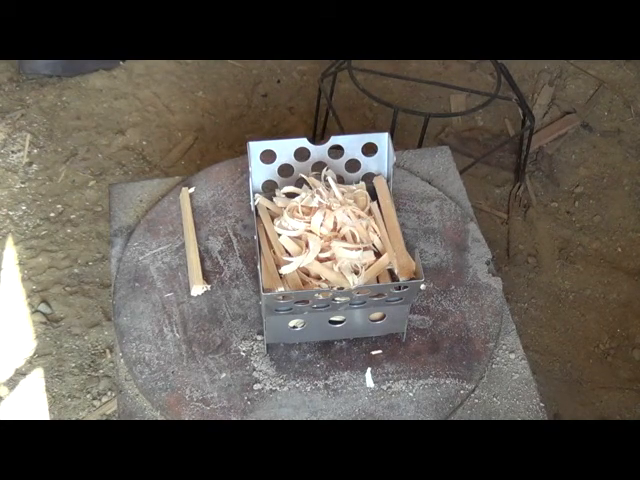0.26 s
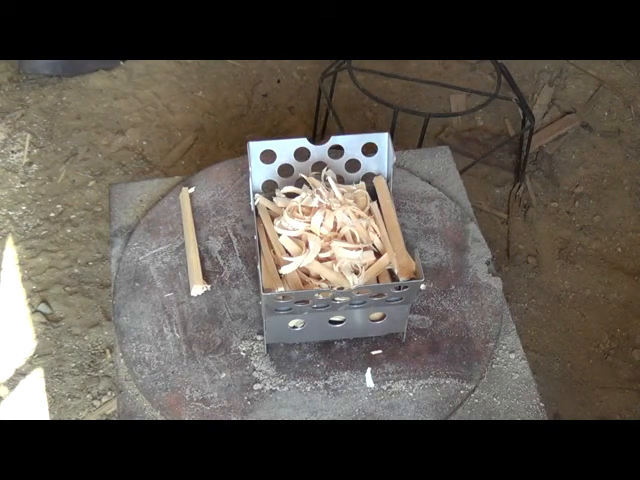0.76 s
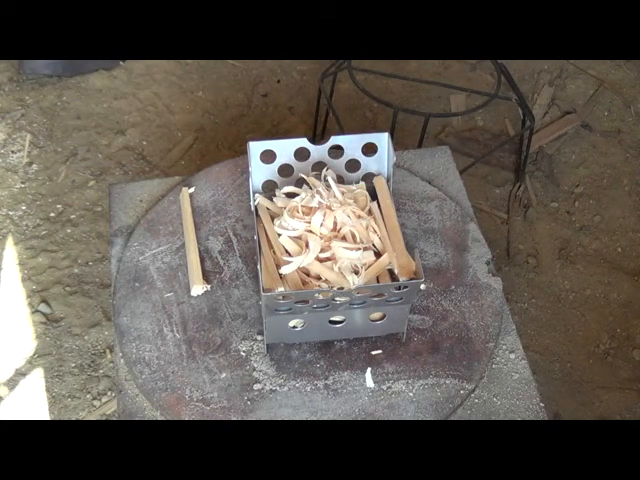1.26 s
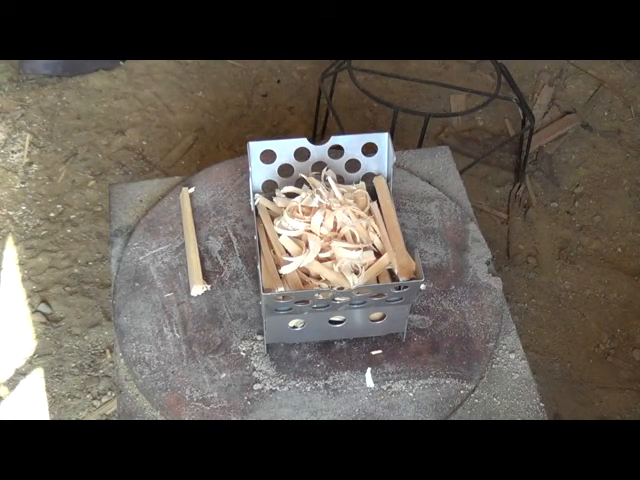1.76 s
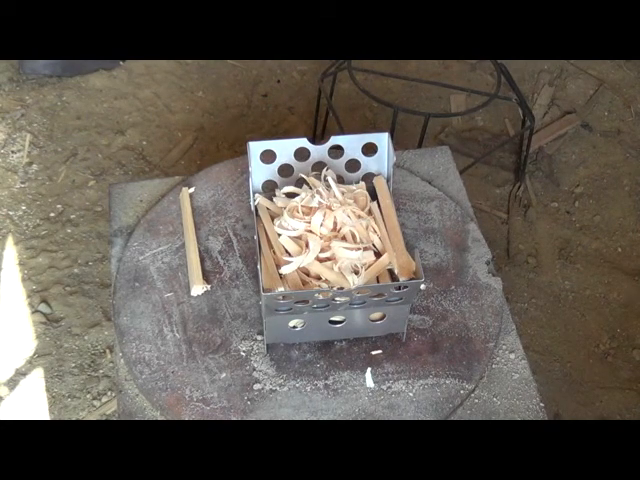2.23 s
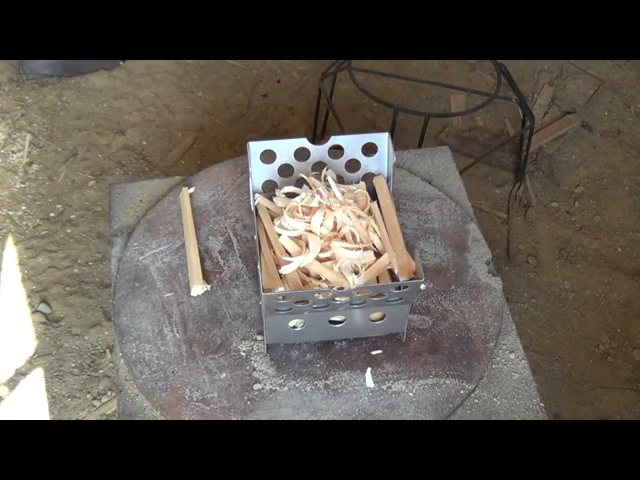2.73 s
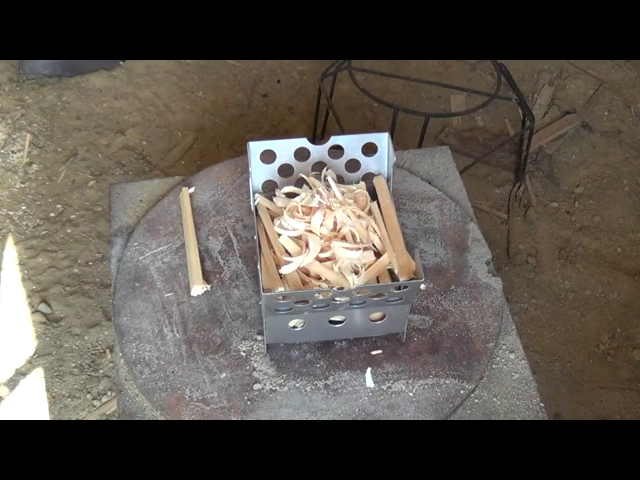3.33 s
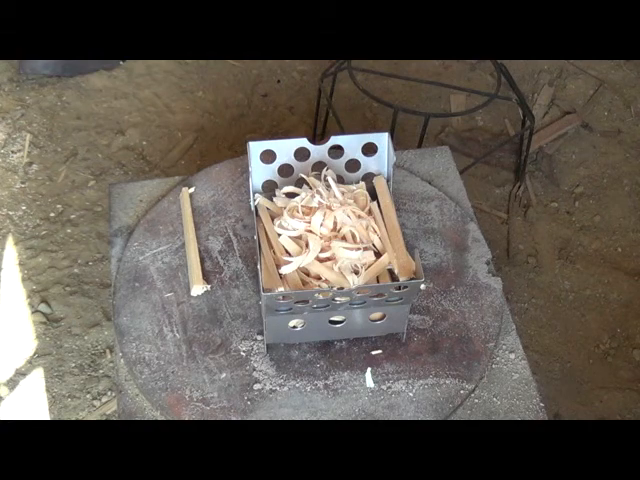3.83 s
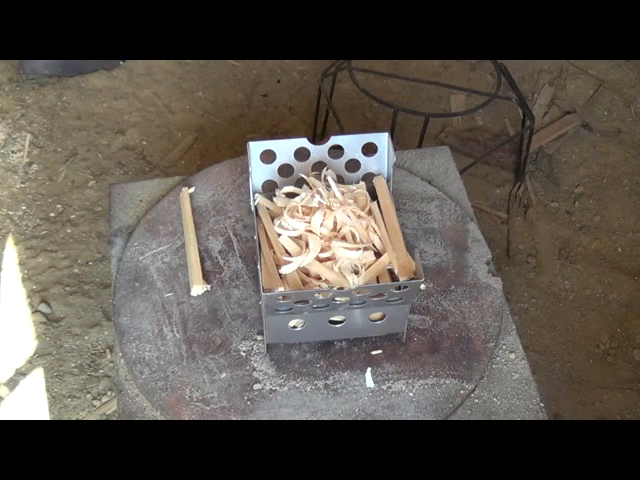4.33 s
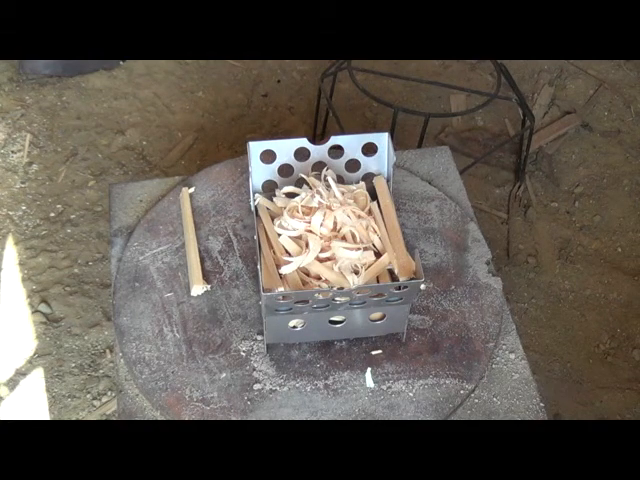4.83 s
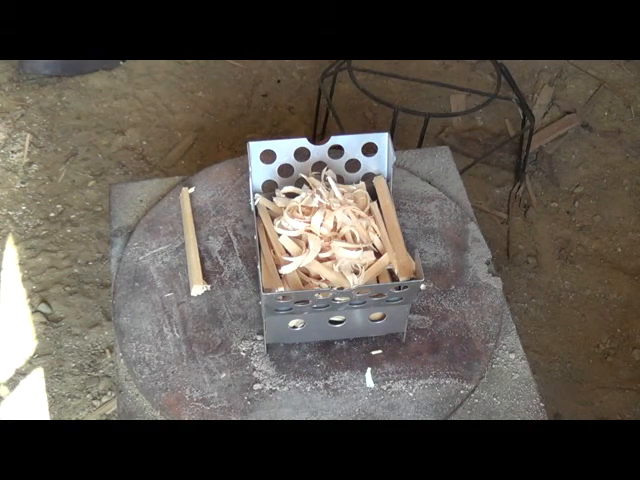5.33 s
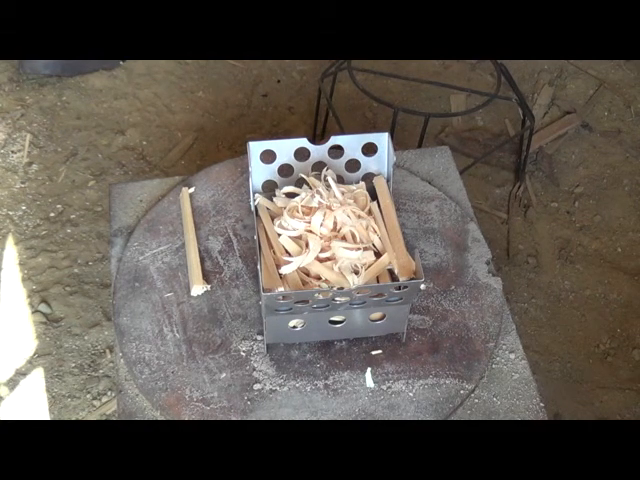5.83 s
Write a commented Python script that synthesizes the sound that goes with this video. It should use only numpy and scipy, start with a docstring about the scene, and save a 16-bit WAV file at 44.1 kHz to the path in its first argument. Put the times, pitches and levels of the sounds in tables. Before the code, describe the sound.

Card rustles and snaps close by, a cluster of wooden knocks and loud clicks lands around 1.5 seconds, then lighter, sparser flicks over soft hiss.

```python
"""Hands work a paper matchbook just left of a camera's microphones in a covered yard: card rubs and snaps,
and a match head scuffs the strip, all made of grainy noise ringing in card resonances.
Dull knocks drive the modes of a wooden thing near the middle, with short low hums as it rocks to rest.
Close roof, posts and table return a short dull tail to the touches and knocks; behind them the camera's
works tick faintly as filtered impulses, over air and microphone hiss made of noise bands."""
import sys
import numpy as np
from scipy import signal
from scipy.io import wavfile
from scipy.ndimage import uniform_filter1d

SR = 44100
rng = np.random.default_rng(int(sys.argv[2]) if len(sys.argv) > 2 else 0)


def generate_wav(sig):
    """Save sig (samples, or channels by samples) to the path in sys.argv[1] as 16-bit PCM at SR."""
    pcm = np.round(np.clip(np.atleast_2d(sig).T, -1, 1) * 32767).astype(np.int16)
    wavfile.write(sys.argv[1], SR, pcm)


N = 268128  # length in samples
OPPOSITE = np.array([[1], [-1]])  # signs of a side signal at the left and right microphone


def undb(db):
    """Amplitude factor of a level in dB."""
    return 10 ** (np.asarray(db) / 20)


def level(x, db):
    """Scales a sound to an RMS level in dB."""
    return x * undb(db) / np.sqrt(np.mean(x ** 2))


def sides(pan_db):
    """Left and right gains in dB for a difference of left minus right."""
    return OPPOSITE * pan_db / 2


def band(x, hz, width):
    """Two-pole resonance, gain 1 at the centre."""
    b, a = signal.iirpeak(min(hz, .45 * SR), hz / width, fs=SR)
    return signal.lfilter(b, a, x)


def ring_width(t60):
    """Width in Hz of a resonance that falls by 60 dB in t60 seconds."""
    return np.log(1000) / np.pi / t60


def resonate(x, peaks):
    """Steep resonances side by side, neighbours in opposite phase; scaled to about keep white noise's level."""
    out, power = 0, 0
    for k, (hz, width, db) in enumerate(peaks):
        out = out + (-1) ** k * undb(db) * band(band(x, hz, width), hz, width)
        power += undb(db) ** 2 * width * np.pi / 2 / SR
    return out / np.sqrt(power)


def fade(t60):
    """Exponential decay down to -60 dB, lasting at least 2 ms."""
    length = max(t60, .002) * SR
    return 10 ** (-3 * np.arange(int(length)) / length)


def swell(rise, t60, hold):
    """Linear rise of at least 0.5 ms, hold, exponential fall."""
    up = np.linspace(0, 1, int(max(rise, .0005) * SR))
    return np.concatenate([up, np.ones(int(hold * SR)), fade(t60)])


def add(out, s, x, pan_db):
    """Mixes a sound in at a time and a side."""
    i = int(s * SR)
    x = x[:N - i]
    out[:, i:i + len(x)] += x * undb(sides(pan_db))


def walk(rate):
    """Random levels held 1 / rate s and slewed twice; spread near 1."""
    k = int(SR / rate)
    steps = np.repeat(rng.standard_normal(N // k + 1), k)
    return 0.53 * uniform_filter1d(uniform_filter1d(steps, k), k)[:N]


def slips(size, grain_db, count=30):
    """Paper fibres letting go: noise in grains of under a millisecond, many small and a few large."""
    grains = np.repeat(rng.exponential(size=size // count + 1), count)[:size]
    return level(rng.standard_normal(size) * undb(grain_db * grains), 0)


def shaken(grit, s, rise, t60, hold=0):
    """The slips that fall under one swelling and dying contact, with room for the ring after it."""
    start = int(s * SR)
    shape = np.pad(swell(rise, t60, hold), (0, 3000))[:N - start]
    return shape * grit[start:][:len(shape)]


# Air and hiss by band, before the overall level is set: f/Hz, density level/dB (per Hz)
AIR_SPECTRUM = [(45, 1), (100, -5.5), (200, -3.5), (400, -0.5), (900, -4), (1800, -1.5), (3000, -10.5),
                (5000, -7), (7500, -11.5), (11000, -11.5)]
# How alike the air is at the two microphones: f/Hz, left-right correlation (0 to 1)
AIR_CORRELATION = [(60, 1), (300, 0.78), (1200, 0.023), (5000, 0.19), (11000, 1)]
AIR_DB = -64.5  # RMS over both microphones


def air():
    """Third-octave bands of outdoor air and microphone hiss that swell and flicker."""
    air_hz, air_db = np.transpose(AIR_SPECTRUM)
    like_hz, likeness = np.transpose(AIR_CORRELATION)
    out, slow = 0, walk(.7)  # all bands share the slow swell
    for hz in 45 * 2 ** (np.arange(25) / 3):
        mid, side = (resonate(rng.standard_normal(N), [(hz, hz / 3, 0)]) for _ in range(2))
        # wider bands hold more of the density per Hz
        db = np.interp(np.log(hz), np.log(air_hz), air_db) + 10 * np.log10(hz)
        like = np.interp(np.log(hz), np.log(like_hz), likeness)
        pair = np.sqrt(1 + like) * mid + np.sqrt(1 - like) * side * OPPOSITE
        flicker_db = 0.63 * slow + 1.1 * walk(8)
        out = out + undb(db + flicker_db) * pair
    return level(out, AIR_DB)


TICK_RATE, TICK_START_S = 30000 / 1001, .006  # ticks per second; first tick
TICK_HZ, TICK_T60_S, TICK_DB = 2727, .03, -75  # pitch; ring time; RMS midway between the microphones


def camera():
    """Once a frame the camera's works tick, to and fro by turns, nearer the right microphone."""
    ticks = np.arange(int(N / SR * TICK_RATE))
    at = ((TICK_START_S + ticks / TICK_RATE) * SR).astype(int)
    push = np.zeros(N)
    push[at] = (-1.) ** ticks * undb(1.6 * rng.standard_normal(len(at)))
    width = ring_width(TICK_T60_S)
    tick = band(band(push, TICK_HZ, width), TICK_HZ, 3 * width)
    return level(tick, TICK_DB) * undb(sides(-3))


YARD_T60_S, YARD_DB = .075, -6.5  # fall time; tail energy against the direct sound, for white noise
YARD_HZ, YARD_WIDTH_HZ = 2540, 5000  # centre and width of the tail's band


def yard(direct):
    """Nearby roof, posts and table send back a short duller tail, different at each side."""
    shape = np.pad(fade(YARD_T60_S), (60, 0))  # the tail sets in 60 samples late
    middle, out = direct.mean(0), []
    for _ in range(2):
        noise = shape * rng.standard_normal(len(shape))
        tail = level(band(noise, YARD_HZ, YARD_WIDTH_HZ), YARD_DB) / np.sqrt(len(shape))
        out.append(signal.fftconvolve(middle, tail)[:N])
    return np.array(out)


# The wood rocks to rest and hums, near the middle: t/s, length/s, f/Hz, peak level/dB
ROCKING_HUMS = [(1.437, .025, 84.5, -38), (1.442, 0.045, 131, -28.5), (1.53, 0.022, 218, -29),
                (1.592, 0.083, 153, -35), (1.69, 0.063, 165.4, -42.5), (1.707, 0.031, 374, -41),
                (1.74, 0.037, 365, -43)]


def rocking():
    """Short low hums of the wood that swell and fade, as sines under a raised-cosine swell."""
    out = np.zeros((2, N))
    for s, length, hz, db in ROCKING_HUMS:
        t = np.arange(int(length * SR)) / SR
        shape = np.sin(np.pi * t / length) ** 2
        add(out, s, undb(db) * shape * np.sin(2 * np.pi * hz * t), .4)
    return out


# Dull blows on the wooden thing: t/s, level/dB (RMS of the early part), rise/s, rattle t60/s, contact f/Hz
BLOWS = [(1.448, -26.5, 0.0021, 0.1, 1060), (1.469, -36, .002, 0.11, 554), (1.537, -31, 0.001, .12, 1240),
         (1.546, -26, 0.0015, 0.085, 534), (1.575, -38.5, 0.0033, 0.18, 930), (1.669, -46, .004, 0.1, 664),
         (1.7, -48, 0.035, 0.14, 400), (1.855, -44.5, .005, 0.057, 970), (3.031, -57.5, 0.0032, 0.046, 510),
         (5.25, -80, .001, .01, 1290), (5.466, -56, 0.0013, 0.05, 780), (5.794, -54, 0.0008, 0.041, 2080)]
# Modes of the wooden thing: f/Hz, relative level/dB, t60/s
WOOD_MODES = [(149, 3.5, 0.085), (294, -8, 0.026), (523, -7, 0.18), (780, -13.5, 0.066), (1100, -37, 0.163),
              (1211, -7.5, 0.064), (1460, -36, 0.068), (1650, -15, 0.038), (2160, -12, 0.032)]


def knocks():
    """A rattling contact drives the wood's modes, most strongly those near the contact's own pitch."""
    out, grit = np.zeros((2, N)), slips(N, grain_db=2.5)
    for s, db, rise, t60, contact_hz in BLOWS:
        push = resonate(shaken(grit, s, rise, t60), [(contact_hz, 1.3 * contact_hz, 0)])
        ring = 0.17 * push  # the bare contact heard beside the modes
        for hz, mode_db, mode_t60 in WOOD_MODES:
            ring = ring + undb(mode_db) * band(push, hz, ring_width(mode_t60))
        early = ring[:int((rise + t60 / 4) * SR)]
        add(out, s, ring * undb(db) / np.sqrt(np.mean(early ** 2)), .6)
    return out


# Hiss of the card's edge: f/Hz, width/Hz, relative level/dB
EDGE_HISS = [(8900, 5000, 7.5), (10396, 4140, 7)]
# Thud of the booklet: f/Hz, width/Hz, relative level/dB
BOOKLET = [(553, 1210, 2.5), (1460, 3300, -1)]


def card(push, ring, body_db, edge_db):
    """The card rings in the middle, its edge hisses on top, the booklet thuds below."""
    body = undb(body_db) * resonate(push, BOOKLET)
    edge = (-1) ** len(ring) * undb(edge_db) * resonate(push, EDGE_HISS)  # phases go on alternating
    return resonate(push, ring) + body + edge


# Fingers sliding on card, levels gliding between rows: t/s, ring level/dB, body over ring level/dB
SLIDES = [(0.0, -58.5, -2), (0.299, -59.5, -1), (0.6, -52.5, -3.5), (0.75, -54.5, -2), (1.12, -57, 1.5),
          (1.4, -54, -1), (1.52, -40.5, 3.5), (1.66, -53, 4), (1.8, -55, 4), (1.94, -42, -8.5),
          (2.06, -52.5, -1.5), (2.2, -48.5, -2.5), (2.69, -55.5, 0), (2.81, -62.5, -1.5),
          (3.37, -61.5, -0.5), (3.54, -63.5, 0), (3.86, -57, -6.5), (4.03, -64, -2), (4.21, -64, 2.5),
          (4.59, -66.5, -1), (4.99, -61.5, -6), (5.32, -67, -4), (5.5, -62.5, -3), (5.74, -64, -3.5),
          (6.08, -64.5, -1)]
# Resonances of the rubbed card: f/Hz, width/Hz, relative level/dB
CARD_RING = [(2980, 1480, 1), (3550, 1570, -2.5), (5620, 2200, -7)]
RUB_EDGE_DB, RUB_SIDE_DB, RUB_PAN_DB = -1.5, -7, 2  # mean treble over ring; side under mid; left minus right


def rubbing():
    """Sliding fingers and sleeves as grainy noise through the card, spread wide; the grip flutters."""
    s, ring_db, body_db = np.transpose(SLIDES)
    t = np.arange(N) / SR
    db = np.interp(t, s, ring_db)
    body_db = np.interp(t, s, body_db) + 0.5 * walk(24)
    edge_db = RUB_EDGE_DB + 2.9 * walk(19)
    grip = undb(2.0 * walk(40))
    mid, side = (card(grip * slips(N, grain_db=1.09), CARD_RING, body_db, edge_db) for _ in range(2))
    sound = mid + undb(RUB_SIDE_DB) * side * OPPOSITE
    return sound * undb(db + sides(RUB_PAN_DB))


HANDS_PAN_DB, HANDS_SWAY_DB = 4.5, 2  # mean left minus right; scatter from touch to touch


def touch(out, s, push, hz, width, upper_db, body_db, edge_db, db):
    """One contact rings the card at its own pitch and an overtone, left of the microphones."""
    ring = [(hz, width * hz, 0), (1.55 * hz, 0.8 * hz, upper_db)]
    sound = card(push, ring, body_db, edge_db)
    peak = np.sqrt(uniform_filter1d(2 * sound ** 2, size=60).max())  # loudest 60 samples
    add(out, s, sound * undb(db) / peak, HANDS_PAN_DB + HANDS_SWAY_DB * rng.standard_normal())


# Short drags over the rough strip: t/s, peak level/dB, ring f/Hz, body over ring level/dB,
# treble over ring level/dB, length/s
DRAGS = [(0.13, -45, 3020, 0.5, 5.5, .09), (0.42, -42.5, 3500, 0, 9, 0.1),
         (0.555, -40.5, 1490, -7, 6, 0.056), (1.385, -36, 3350, -14, -3.5, 0.024),
         (1.432, -30.5, 1510, 10, 9, .06), (1.515, -45, 3000, -10, -1, 0.018),
         (1.578, -33, 1820, 7, -1.5, 0.036), (1.63, -43, 1010, 0, -12, 0.092),
         (1.715, -40, 3030, 2.5, -14, 0.055), (1.812, -36.5, 3100, -9.5, -27, 0.053),
         (1.865, -34, 2970, -12, -22, 0.066), (1.94, -35.5, 3000, 9, 11, 0.029),
         (2.112, -43, 3920, -1, -12, .02), (2.13, -39.5, 1410, -3, -6, 0.014),
         (2.168, -40, 4330, -5, -8, 0.034), (2.325, -41, 3730, -11, -8, 0.024),
         (2.39, -46, 3700, -11, -2, 0.034), (3.005, -48.5, 2970, -2, -3, 0.017),
         (3.305, -51, 2820, -25, 6, .02), (3.35, -49, 3680, -8, 5, 0.033),
         (3.437, -43, 3000, -16, 1.5, 0.051), (3.6, -52.5, 2800, -13, -5, 0.035),
         (3.645, -46, 3680, -9, 5, 0.035), (3.685, -47.5, 3270, -13, 10, 0.078),
         (3.812, -46.5, 2800, -23, 8, 0.035), (3.848, -44, 2920, -15, 11, 0.011),
         (4.61, -47.5, 4180, -16, 8, 0.068), (4.77, -56, 4220, -23, 4, 0.053),
         (4.855, -51, 3550, -21.5, 5, 0.029), (4.924, -36.5, 3700, -11, 4.5, 0.041),
         (5.318, -44.5, 3390, -12, 2, 0.088), (5.39, -43, 3000, -9, 0.5, 0.09),
         (5.545, -41, 3280, -21, 2.5, 0.023), (5.58, -45.5, 2740, -17, 11.5, 0.056),
         (5.93, -51.5, 4000, -17, 6.5, 0.072)]
SCUFF_RISE_SHARE, SCUFF_T60_S = 0.24, 0.073  # share of the length spent pressing in; fall after lifting off


def scuffs():
    """A match head presses in, drags and lifts off the strip, shaking the card with grains of noise."""
    out, grit = np.zeros((2, N)), slips(N, grain_db=2.0)
    for s, db, hz, body_db, edge_db, length in DRAGS:
        rise = SCUFF_RISE_SHARE * length
        push = shaken(grit, s, rise, SCUFF_T60_S, hold=length - rise)
        touch(out, s, push, hz, 0.42, -12.5, body_db, edge_db, db)
    return out


# Card edges flicked: t/s, peak level/dB, ring f/Hz, body over ring level/dB, treble over ring level/dB, t60/s
FLICKS = [(0.7278, -35.5, 3140, 0.5, 0.5, 0.03), (0.9016, -45, 3360, -8, 5, .072),
          (0.947, -46, 1310, 19, -20, 0.034), (1.1672, -46.5, 3780, -7, 3, 0.12),
          (1.1901, -45, 4450, -15, -2, .018), (1.2818, -38.5, 3760, -8, 0.5, 0.1),
          (1.3468, -36, 3460, -6, -7, 0.03), (1.456, -22, 3700, -6.5, 0, 0.045),
          (1.461, -22, 4130, -6, 6, 0.032), (1.5321, -19.5, 3980, -31, -9.5, 0.0043),
          (1.5392, -15.5, 1650, -4, -34, 0.0015), (1.6751, -35, 5340, 4, 8, 0.012),
          (1.7563, -40, 6400, -14, 13, 0.011), (1.8641, -30.5, 1180, -16, -12, 0.0074),
          (1.8925, -27.5, 3180, -25, -21, 0.01), (1.9218, -27, 2350, -22, -16, 0.0049),
          (1.9372, -16, 3180, -8, -2.5, 0.0029), (2.0251, -36, 4700, 1.5, 10.5, 0.038),
          (2.1292, -32, 1260, 4, -8, 0.015), (2.1515, -39, 2770, -19, -14, 0.031),
          (2.1656, -18, 3970, -12.5, -2, 0.011), (2.2459, -35, 3800, -10, -3, .015),
          (2.3008, -31.5, 2260, -18, -5, 0.051), (2.4171, -37, 1560, 6, -1.5, 0.021),
          (2.494, -44, 1490, 10, 10, 0.021), (2.7552, -42, 2350, -7, 12, 0.004),
          (2.9196, -43, 2320, -2, -2, 0.0051), (2.9489, -37, 4860, -12, -1, 0.0044),
          (3.0283, -33.5, 2600, -5, -3.5, .012), (3.1373, -40.5, 5200, -5.5, -20, 0.025),
          (3.3704, -45.5, 3830, -2, -3, .04), (3.7114, -32, 2990, -12, 5.5, 0.035),
          (3.7622, -47, 2580, -17, 5, 0.057), (3.8929, -48.5, 4500, -12, -14, .006),
          (3.9096, -45.5, 2100, -3, -20, 0.0068), (4.6495, -36, 3970, -10.5, 6, 0.049),
          (4.8762, -40.5, 3630, -22, 8, 0.05), (4.9068, -37.5, 3600, -14, 6.5, 0.045),
          (4.9528, -32.5, 3840, -14, 0, 0.018), (5.1092, -45, 3500, -29, -1, 0.051),
          (5.1346, -46.5, 3440, -18, -10, 0.013), (5.2499, -45.5, 1770, -9, -21, 0.013),
          (5.4102, -44.5, 2900, -2, -2, .014), (5.469, -37.5, 5700, -1, 1, 0.015),
          (5.6319, -44.5, 2480, -22, 7, 0.038), (5.791, -32.5, 3260, -16, 4.5, 0.0071),
          (5.8951, -50, 3200, -27, -3, 0.031)]
SNAP_RISE_S, SNAP_RISE_SHARE = .0006, .025  # a longer flick swells longer: fixed part, share of t60


def snaps():
    """A flicked card edge swells in a moment, rings and dies."""
    out, grit = np.zeros((2, N)), slips(N, grain_db=1.7)
    for s, db, hz, body_db, edge_db, t60 in FLICKS:
        push = shaken(grit, s, SNAP_RISE_S + SNAP_RISE_SHARE * t60, t60)
        touch(out, s, push, hz, 0.37, -14.5, body_db, edge_db, db)
    return out


def scene():
    """The matchbook and wood up close, the yard's answer to the hits, the camera and the air behind."""
    hits = snaps() + scuffs() + knocks()
    background = air() + camera()
    return background + yard(hits) + rocking() + rubbing() + hits


def record(dry):
    """The camera cuts the deep bass below 100 Hz and the top above 11050 Hz."""
    dry = signal.sosfilt(signal.butter(3, 100, "high", fs=SR, output="sos"), dry)
    return signal.sosfilt(signal.ellip(14, .2, 80, 11050, fs=SR, output="sos"), dry)


dry = scene()
out = record(dry)
generate_wav(out)
```